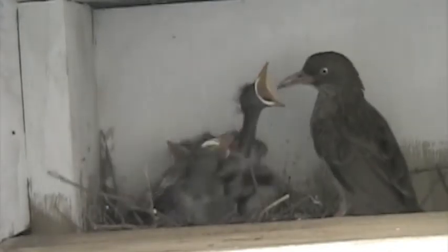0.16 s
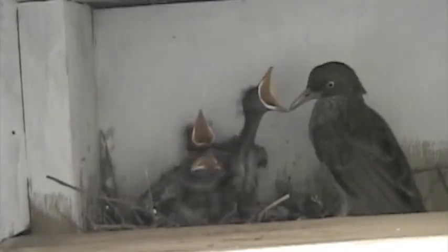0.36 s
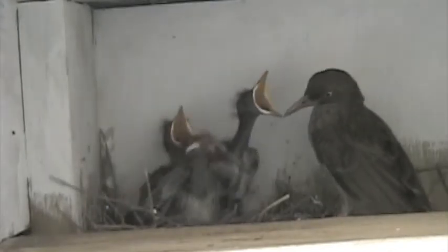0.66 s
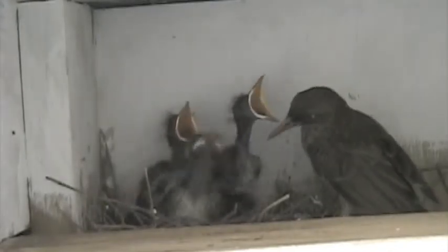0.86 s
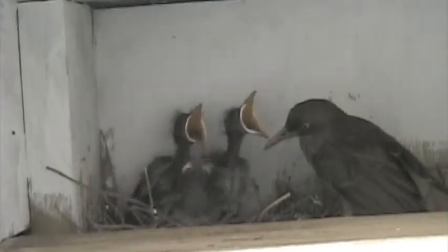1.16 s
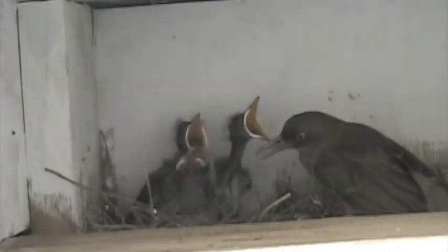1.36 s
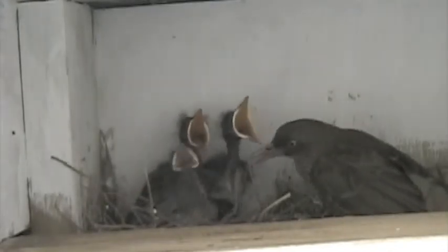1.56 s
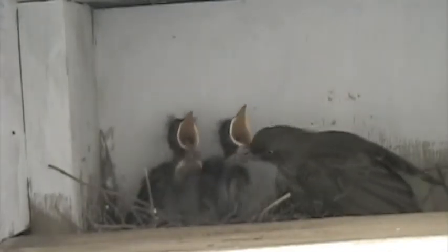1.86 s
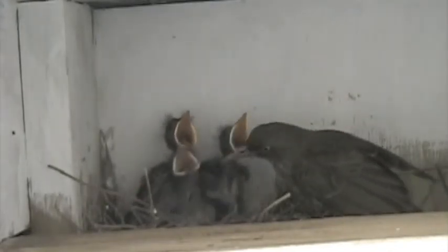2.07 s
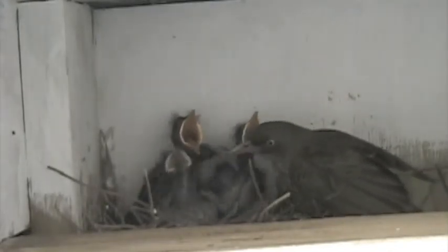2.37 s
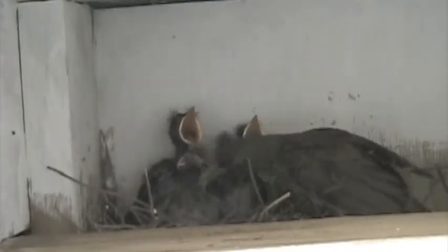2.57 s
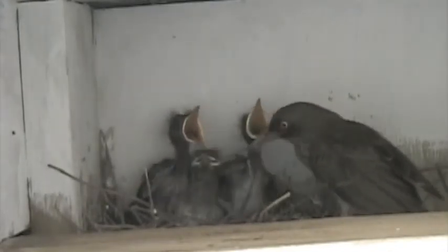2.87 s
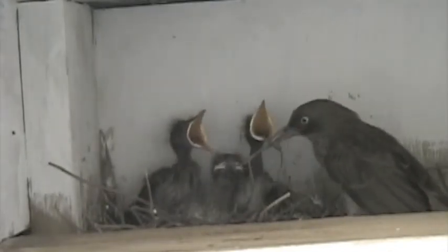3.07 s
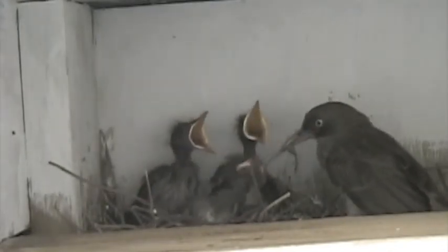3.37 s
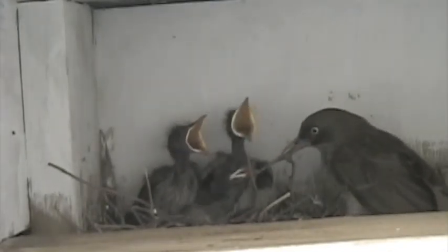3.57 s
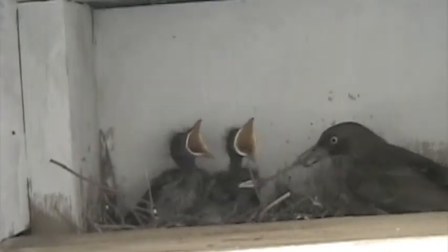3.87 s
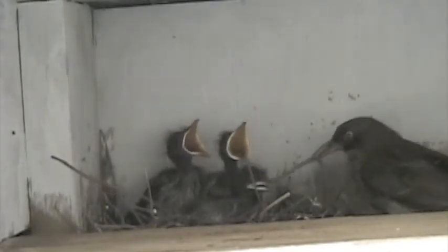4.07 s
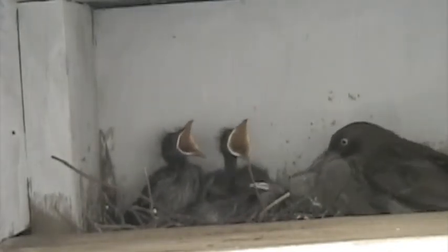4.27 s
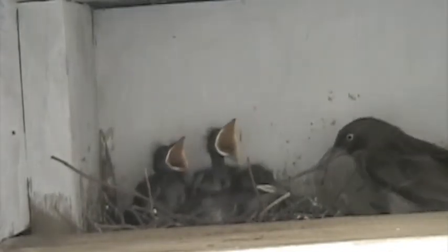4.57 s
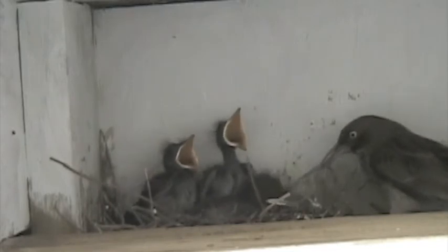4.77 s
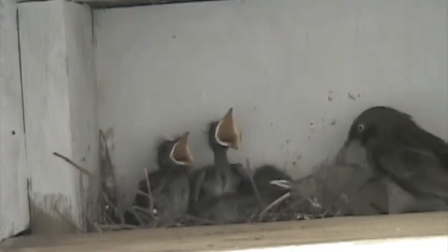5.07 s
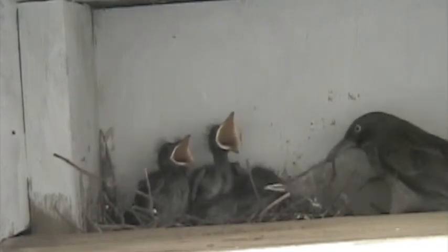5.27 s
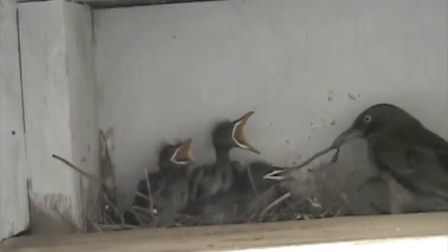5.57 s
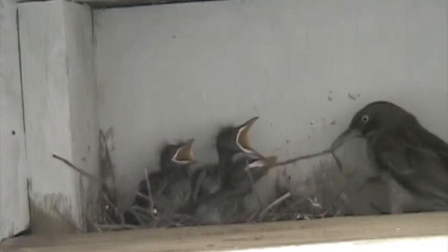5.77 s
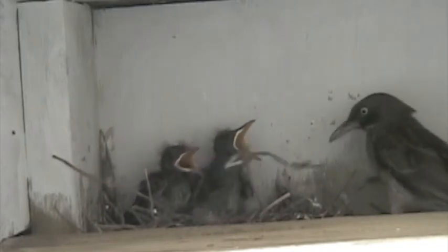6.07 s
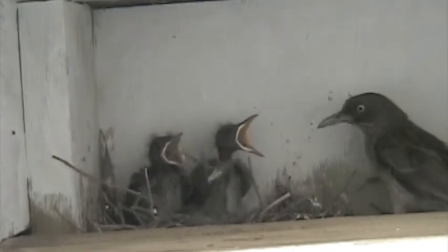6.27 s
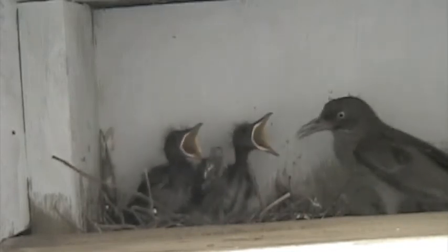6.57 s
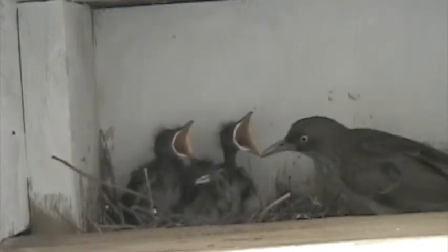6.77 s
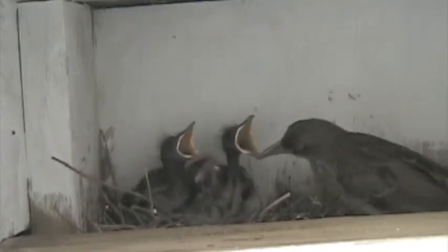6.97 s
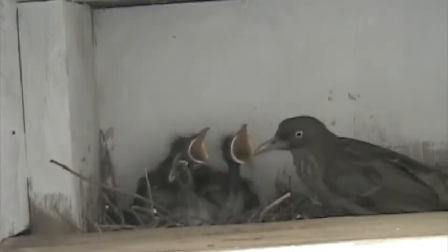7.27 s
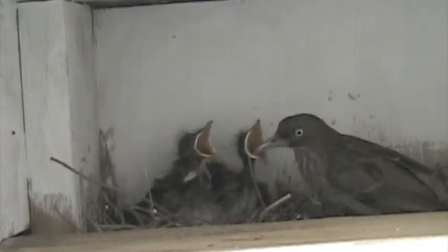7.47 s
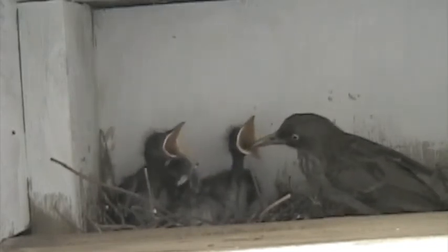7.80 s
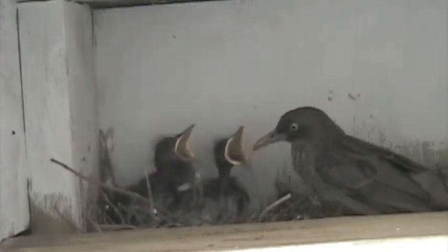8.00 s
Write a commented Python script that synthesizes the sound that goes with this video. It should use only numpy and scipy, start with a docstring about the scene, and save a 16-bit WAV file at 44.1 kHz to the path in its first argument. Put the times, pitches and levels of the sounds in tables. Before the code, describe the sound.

Close, shrill begging from two nestlings on a sheltered wooden ledge, in stereo. A loud screech is already sounding at 0 s, two or three peeps follow near 0.15 s, and another strong screech comes around 0.2-0.45 s. Peeps resume at 0.5 s and a screech at 0.7 s; from about 0.9 s the calls overlap almost continuously. One chick pipes runs of three to six clear peeps, about fourteen a second, each dropping, swelling and usually flicking upward, around 6-7.5 kHz. The other screeches every 0.4 s or so, in fluttering arches near 8-9 kHz, with buzzing double tones and low raspy breaks. From 5 s the peep runs are often shorter, and screeches come forward again after 6.5 s, continuing to the end at 8 s. Boards add brief bright reflections; a faint low outdoor murmur gently swells behind.

```python
"""Two nestlings begging close by

They beg in a nest on a sheltered wooden ledge, close to a camcorder's microphone pair. One chick pipes runs of
nearly pure peeps, about 14 a second: gliding sines with a faint overtone. Another screeches in two-voiced
arches with beating sidebands, which break into low, raspy dips. The boards answer with short noise tails;
behind, filtered noise makes an outdoor murmur, and the background level drops and recovers here and there. The
camcorder combs out the harmonics of its motor, ducks at high peaks and cuts the top of the band."""
import sys
import numpy as np
from scipy import signal
from scipy.fft import rfft, irfft, next_fast_len
from scipy.io import wavfile
from scipy.ndimage import uniform_filter1d, map_coordinates

SR = 44100
rng = np.random.default_rng(int(sys.argv[2]) if len(sys.argv) > 2 else 0)


def inscribe(sig):
    """Save sig as 16-bit PCM at rate SR to the path in sys.argv[1].

    A 1-D sig is mono; a 2-D sig holds one channel per row.
    Samples are clipped to [-1, 1] before scaling.
    """
    pcm = np.round(np.clip(np.atleast_2d(sig).T, -1, 1) * 32767)
    wavfile.write(sys.argv[1], SR, pcm.astype(np.int16))


N = 358974

T = np.arange(-round(.06 * SR), round(.06 * SR)) / SR  # seconds around the middle of a note

# screeches, one call a row, before the scatter and trims of the notes: highest_arch_s, end_s,
# top_pitch_hz, last_arch_pitch_hz, level_db, last_arch_level_db, second_voice_db, sideband_db,
# first_dip_pitch_hz, dips_level_db, closing_fall_level_db
SCREECH_CALLS = [(-0.020, 0.088, 8160, 7980, -10.5, -16, -23.5, -34, 5650, -26.5, -21),
                 (0.267, 0.452, 8536, 7860, -10, -5.5, -25, -32, 5430, -21, -23),
                 (0.712, 0.900, 8760, 7640, -11.5, -11.5, -26, -33.5, 5650, -21.5, -38),
                 (1.155, 1.350, 8890, 7910, -23, -15.5, -27.5, -35, 5600, -28, -40),
                 (1.609, 1.743, 8740, 8770, -15, -18, -23.5, -25, 5450, -23.5, -19),
                 (2.03, 2.19, 8910, 8920, -17, -20.5, -28, -24, 5660, -21, -20),
                 (2.459, 2.590, 9040, 8620, -17.5, -17.5, -24.5, -24.5, 5650, -24.5, -22.5),
                 (2.881, 3.075, 8980, 7680, -16, -21, -25, -26, 5580, -24.5, -54),
                 (3.313, 3.445, 8890, 8600, -19.5, -15.5, -29, -29, 5540, -23.5, -31),
                 (3.724, 3.845, 8940, 8350, -21.5, -22, -21, -21.5, 5530, -23, -28),
                 (4.115, 4.246, 8850, 8350, -17, -19.5, -28, -23.5, 5730, -21.5, -22),
                 (4.53, 4.668, 9100, 8660, -20.5, -25, -22.5, -22, 5910, -21, -19.5),
                 (4.958, 5.041, 8720, 8620, -28, -34, -24.5, -27.5, 5660, -23, -20.5),
                 (5.344, 5.461, 8980, 7590, -31, -13, -26.5, -26.5, 5730, -25.5, -36.5),
                 (5.748, 5.863, 8740, 7890, -26, -19.5, -20, -28.5, 5930, -25, -33),
                 (6.163, 6.347, 8840, 7200, -35, -10, -16.5, -29, 6080, -24.5, -35),
                 (6.615, 6.735, 8830, 8450, -17, -21, -24, -30.5, 5980, -24, -29.5),
                 (7.012, 7.145, 8960, 8380, -13.5, -19.5, -25.5, -23.5, 5870, -22, -23.5),
                 (7.411, 7.540, 9020, 8380, -14, -12, -31.5, -24, 5800, -23.5, -26.5),
                 (7.811, 7.946, 8830, 8480, -15.5, -17, -21.5, -22.5, 5860, -24, -24.5),
                 (8.216, 8.345, 8680, 8400, -19, -20, -26.5, -26, 5700, -25, -30)]


def amp(db):
    """Decibels as an amplitude factor."""
    return 10 ** (np.asarray(db) / 20)


def unit(x):
    """The signal scaled to an rms of 1."""
    return x / np.sqrt(np.mean(x ** 2) + 1e-20)


def along(points, hz):
    """Values between (Hz, value) points, joined on a logarithmic frequency axis."""
    f, v = np.transpose(points)
    return np.interp(np.log(hz + 1), np.log(f + 1), v)


def wobble(rate, size=len(T)):
    """A smooth random curve with rate knots a second."""
    knots = rng.standard_normal(int(size * rate / SR) + 4)
    return map_coordinates(knots, [np.arange(size) * rate / SR])


def filtered(x, response):
    """The signal shaped by a complex response of frequency."""
    m = next_fast_len(x.shape[-1] + SR // 2)  # half a second of padding or more
    spectrum = rfft(x, m) * response(np.fft.rfftfreq(m, 1 / SR))
    return irfft(spectrum, m)[..., :x.shape[-1]]


def pair(alike, size):
    """Stereo noise from a mid and a side, balanced by frequency to set how alike left and right are."""
    def balance(hz):
        turn = np.arccos(np.clip(along(alike, hz), -1, 1)) / 2
        return np.array([np.cos(turn), np.sin(turn)])

    mid, side = filtered(rng.standard_normal((2, size)), balance)
    return np.array([mid + side, mid - side])


def gesture(points):
    """The (s, value) points of one note, joined by lines with rounded corners."""
    s, v = np.transpose(points)
    return uniform_filter1d(np.interp(T, np.sort(s), v), size=130)


def tone(hz):
    """A sine of rms 1 on a moving pitch, from a random phase."""
    cycles = np.cumsum(hz) / SR + rng.random()
    return np.sqrt(2) * np.sin(2 * np.pi * cycles)


def add(track, s, note):
    """Lay a note into a track with its middle at s."""
    at = round(s * SR) - len(T) // 2 + np.arange(len(T))
    inside = (at >= 0) & (at < N)
    track[..., at[inside]] += note[..., inside]


def peeps(overtone_db=-48, waver=0.0036, hoarse=0.028, rest_hz=7700, climb=.55, sink_hz=250,
          throat_top_hz=14200):
    """Each peep drops in from above, swells at the bottom and fades; unless slack, it climbs again."""
    pan_mean_db, pan_scatter_db = 1.95, 2  # left over right; random scatter from peep to peep
    out = np.zeros((2, N))
    swell_db = gesture([(-.024, -80), (-.015, -9), (-.0075, -10), (-.0045, 4.5), (.004, 1),
                        (.011, -8.5), (.02, -9), (.033, -21), (.055, -60)])
    for s, hz, db, hoarseness, slack in peep_notes():
        pan_db = rng.normal(pan_mean_db, pan_scatter_db)
        rise = max(rest_hz - hz, 0) * climb * (1 - slack) - sink_hz * slack
        glide = hz + gesture([(-.021, 604.5), (-.013, 15), (-.006, -100), (.003, 36.5),
                              (.022, rise + 30), (.034, rise + 120), (.05, rise - 250)])
        # hoarseness shakes the pitch fast, on top of a finer waver and a slow drift
        shake = waver * wobble(253) + hoarse * hoarseness ** 2 * wobble(912) + 0.0026 * wobble(74.0)
        pitch = glide * (1 + shake)
        loud = amp(db + swell_db + 3 * hoarseness * wobble(300))
        # the overtone is lost where it climbs past the top of the throat's range
        overtone = amp(overtone_db + 5 * wobble(260)) / (1 + (2 * pitch / throat_top_hz) ** 20)
        note = loud * (tone(pitch) + overtone * tone(2 * pitch))
        add(out, s, note * amp([[pan_db / 2], [-pan_db / 2]]))
    return out


def peep_notes():
    """Evenly spaced peeps in runs. Yields (s, Hz, dB, hoarseness, slackness)."""
    # runs of peeps: first_peep_s, last_peep_s, first_pitch_hz, top_pitch_hz, last_pitch_hz,
    # fall_lateness (power), first_level_db, middle_level_db, last_level_db, opening_hoarseness (0-1)
    runs = [(0.12, 0.187, 7590, 7590, 6220, 1, -22, -23, -19.5, 0.9),
            (0.515, 0.657, 6560, 6860, 6400, 1, -8.5, -14.5, -16.5, 0.26),
            (0.931, 1.282, 6130, 7110, 6350, 0.58, -16.5, -15.5, -16.5, 0.1),
            (1.493, 1.85, 6380, 6980, 6550, 2.2, -18, -15.5, -11, 0.1),
            (2.166, 2.463, 7160, 7206, 6240, 2.6, -12, -16, -15.5, 0.18),
            (2.66, 2.947, 6570, 7240, 6300, 2.6, -16, -10, -13.5, 0.1),
            (3.151, 3.445, 6400, 7510, 6086, 3.1, -16, -18.5, -17, 0.3),
            (3.648, 4.011, 6960, 7480, 6224, 2.02, -21, -17, -16.5, 0.9),
            (4.214, 4.505, 6990, 7540, 5800, 3.25, -10.5, -10.5, -13, .5),
            (4.7, 5.002, 6770, 7635, 5770, 1.9, -12.5, -13, -13, 0.88),
            (5.213, 5.43, 6756, 7490, 6525, 0.98, -10, -15, -10.5, 0.3),
            (5.702, 5.999, 6920, 7080, 6447, 1, -25.5, -11, -10, 0),
            (6.239, 6.384, 7050, 6780, 6800, 1.2, -13, -15.5, -13.5, 0.7),
            (6.637, 6.862, 6920, 7220, 6920, 1.9, -12, -21, -9.5, .3),
            (7.079, 7.293, 7000, 7490, 6810, 1.36, -17, -17.5, -10, .7),
            (7.533, 7.75, 6850, 7530, 7160, 2.2, -19, -14.5, -17.5, 0.9),
            (8.016, 8.081, 6880, 7620, 7550, 1, -17, -12, -14.5, 0.9)]
    gap_s = .073  # approximate: the peeps share out the run evenly
    hoarse_kept, hoarse_least = .45, 0.19  # share left at the next peep; the clearest a peep gets
    # a last peep that sinks below this pitch goes slack: hoarse, with no climb
    slack_hz, slack_span_hz, slack_hoarseness = 6480, 656, 0.72
    for start, end, first_hz, top_hz, last_hz, lateness, first_db, middle_db, last_db, opening in runs:
        count = round((end - start) / gap_s) + 1
        for k, u in enumerate(np.linspace(0, 1, count)):
            sunk = (max(k - 1, 0) / (count - 2)) ** lateness if count > 2 else 1
            hz = top_hz + (last_hz - top_hz) * sunk if k else first_hz
            db = np.interp(u, [0, .5, 1], [first_db, middle_db, last_db])
            slack = np.clip((slack_hz - hz) / slack_span_hz, 0, 1) if k == count - 1 else 0
            hoarseness = max(opening * hoarse_kept ** k, slack_hoarseness * slack, hoarse_least)
            yield start + u * (end - start), hz, db, hoarseness, slack


def arches(fall_hz=800, half_width=.03, gap_hz=740, waver=0.0054, rasp_db=-13, fundamental_db=-43,
           wander_hz=120):
    """Two sides of the syrinx arch in parallel; their beating throws sidebands, most just before the top."""
    out, rasp = np.zeros(N), np.zeros(N)
    swell = amp(gesture([(-.042, -70), (-.029, -2.5), (-.02, 0.5), (.004, -1.16), (.017, -2),
                         (.031, -5), (.055, -52.5)]))
    crest = amp(gesture([(-.032, -33), (-.019, -7.5), (-.009, 0), (.004, -0.5), (.016, -0.5),
                         (.04, -36)]))
    for s, hz, db, second_db, sideband_db in arch_notes():
        arch_hz = hz + 70 - fall_hz * np.minimum((T / half_width) ** 2, 2)  # half_width in seconds
        first = arch_hz * (1 + waver * wobble(491.4) + 0.00932 * wobble(111.85))
        # the second voice wanders on its own, so the sidebands bend apart
        gap = gap_hz * (1 + 0.077 * wobble(702)) + wander_hz * wobble(70)
        first_voice = amp(db - 7.0 + 4.4 * wobble(133.5)) * tone(first)
        second_voice = amp(second_db - 4.0 + 7.5 * wobble(107)) * tone(first - gap)
        above = tone(first + gap)
        above = above + crest * amp(-7) * tone(first + 2 * gap)
        above = above + crest * amp(-12.5) * tone(first + 3 * gap)
        below = amp(min(second_db, sideband_db) - 2) * tone(first - 3 * gap)
        sidebands = crest * (amp(sideband_db - 5 + 3.4 * wobble(198)) * above + below)
        # the throat favours the second harmonic: the fundamental is barely there
        fundamental = amp(db + fundamental_db) * tone(first / 2)
        add(out, s, swell * (first_voice + second_voice + fundamental) + sidebands)
        # the louder the call and its sidebands, the more it rasps
        rasp_level = amp(0.34 * db + 0.79 * sideband_db + rasp_db)
        flutter = amp(4.5 * wobble(400))
        add(rasp, s, swell * rasp_level * flutter)
    return out, rasp


def arch_notes():
    """Screeches rise to the second arch, then droop. Yields (s, top Hz, dB, second voice dB, sideband dB)."""
    # arches of any screech, relative to the call: after_highest_s, second_voice_db, sideband_db
    arch_steps = [(-.075, -3, 1.5), (0, -3, 1.5), (.083, 2, -2), (.16, -6, -38)]
    opening_hz, droop_power = 416, 3.4  # first arch lies below the top; later ones sink ever faster
    sideband_db_per_khz2 = 24  # the voices beat less as the pitch sinks from the top
    for peak, end, top_hz, last_hz, db, last_db, second_db, sideband_db, *_ in SCREECH_CALLS:
        sung = [arch for arch in arch_steps if peak + arch[0] < end - .01]
        for k, (delay, second_step, sideband_step) in enumerate(sung):
            droop = (max(k - 1, 0) / max(len(sung) - 2, 1)) ** droop_power
            sag_hz = (top_hz - last_hz) * droop if k else opening_hz
            sag_loss_db = sideband_db_per_khz2 * (sag_hz / 1000) ** 2
            yield (peak + delay, top_hz - sag_hz, db + (last_db - db) * droop,
                   second_db + second_step, sideband_db + sideband_step - sag_loss_db)


def dips(rough=.024, fundamental_db=-17.5, throat_hz=2660, throat_width=230, overtone_db=-25, rasp_db=-12):
    """The screech breaks to a low, rough note; it sweeps up again unless the call ends there."""
    out, rasp = np.zeros(N), np.zeros(N)
    for s, hz, db, sweep_db, climb, harsh_db in dip_notes():
        fall = 648.5 + 60 * np.clip(db - sweep_db, 0, 12)
        glide = hz + gesture([(-.018, fall), (-.009, 0.301 * fall), (-.001, -200),
                              (.007, 400 * climb - 290), (.015, 1000 * climb - 250),
                              (.03, 2100 * climb - 200)])
        pitch = glide * (1 + rough * wobble(1400) + 0.019 * wobble(215.8))
        contour_db = gesture([(-.018, -90.5), (-.011, db - 1.5), (.002, db + 0.087),
                              (.013, sweep_db - .7), (.021, sweep_db - 28), (.04, -92)])
        loud = amp(contour_db + 2.4 * wobble(400))
        # the fundamental shows only while it passes the lowest throat resonance
        resonance = 1 / (1 + ((glide / 2 - throat_hz) / throat_width) ** 4)
        low = amp(fundamental_db + 2.5 * wobble(115.4)) * resonance
        # the overtone fades as the sweep carries it out of the throat's range
        high = amp(overtone_db) / (1 + (2 * glide / 12800) ** 20)
        add(out, s, loud * (tone(pitch) + low * tone(pitch / 2) + high * tone(2 * pitch)))
        add(rasp, s, loud * amp(rasp_db + harsh_db))
    return out, rasp


def dip_notes():
    """Dips between arches, then a closing fall. Yields (s, base Hz, dB, sweep dB, climb share, extra rasp dB)."""
    # dips of any screech, relative to the call: after_highest_arch_s, level_db, upward_sweep_db
    dip_steps = [(-.0445, 0.5, 11), (0.0432, -1, 9), (0.13, 1.5, 1)]
    later_dip_hz = 5630  # base pitch of every dip but the first, before scatter
    scatter_hz, scatter_db = 69.6, 1.5
    shallow_db_per_khz = 17  # the less deep a dip, the louder
    # sideband level of an ordinary screech; a purer call rasps less in its dips too
    ordinary_sideband_db, rasp_follows = -26, .4
    # the last note sinks on where a dip would sweep up
    closing_hz, closing_sweep_db, closing_climb = 6440, -5, -0.18
    for peak, end, *_, sideband_db, first_hz, dips_db, closing_db in SCREECH_CALLS:
        harsh_db = rasp_follows * (sideband_db - ordinary_sideband_db)
        for k, (delay, step_db, sweep_db) in enumerate(dip_steps):
            hz = rng.normal(later_dip_hz if k else first_hz, scatter_hz)
            shallow_db = shallow_db_per_khz * (hz - later_dip_hz) / 1000
            db = rng.normal(dips_db + step_db + shallow_db, scatter_db)
            if peak + delay < end - .025:
                yield peak + delay, hz, db, dips_db + sweep_db, 1, harsh_db
        yield end, closing_hz, closing_db, closing_db + closing_sweep_db, closing_climb, harsh_db


def rasp_hiss():
    """Steady noise in the colour of the screeching throat, to be shaped by the rasp of the notes."""
    # colour of the rasp: frequency_hz, relative_density_db (per Hz)
    rasp_colour = [(1500, -29), (2650, -8), (3500, -18), (4600, -4.5), (5700, -2.5), (7500, 8.5),
                   (9500, -17), (11300, -4.5), (12600, -18), (15000, -37)]
    return unit(filtered(rng.standard_normal(N), lambda hz: amp(along(rasp_colour, hz))))


def ports(x):
    """High notes reach the two microphone ports with different strength and phase."""
    # the screeching chick at the microphone pair: frequency_hz, left_over_right_db, left_lead_radians
    port_differences = [(4500, 0, 0), (5600, -1, 0.1), (6120, 1.5, 1.2), (6900, -3, 0.04), (7850, 2, -1.9),
                        (8540, -8.5, -1.6), (9260, -5.5, -0.3), (10240, -9, -0.36), (11460, 2.5, 2.15)]
    f, tilt_db, lead = np.transpose(port_differences)

    def left_and_right(hz):
        strength = amp(np.interp(hz, f, tilt_db) / 2)
        half = strength * np.exp(.5j * np.interp(hz, f, lead))
        return np.array([half, 1 / half])

    return filtered(x, left_and_right)


def boards(x, t60=0.16, count=24):
    """The boards round the nest answer with brief noise tails that slowly change."""
    # stereo likeness of the answer: frequency_hz, left_right_likeness (-1 to 1)
    echo_likeness = [(4500, 1), (5600, .97), (6900, 0.86), (8000, 0.15), (11000, 0.05)]
    t, out = np.arange(SR // 5) / SR, np.zeros((2, N))
    place = np.linspace(0, count - 1, N)
    for k in range(count):
        # the decay is 60 dB in t60 seconds, after 1.5 ms of silence
        tail = pair(echo_likeness, len(t)) * amp(-60 * t / t60) * (t > .0015)
        tail = tail / np.linalg.norm(tail[0])
        # neighbouring tails crossfade
        near = np.flatnonzero(abs(place - k) < 1)
        part = x[:, near] * (1 - abs(place[near] - k))
        echo = signal.fftconvolve(part, tail, axes=1)[:, :N - near[0]]
        out[:, near[0]:near[0] + echo.shape[1]] += echo
    return out


def air():
    """A distant outdoor murmur of coloured stereo noise; the background level drops and recovers here and
    there."""
    # course of the murmur, before the lift: time_s, level_db
    murmur_course = [(0.0, -41.5), (0.41, -40), (0.84, -41), (1.11, -44.5), (2.15, -40), (2.38, -43),
                     (2.81, -38.5), (3.38, -44.5), (4.06, -41), (4.76, -41), (4.9, -44.5), (5.58, -47),
                     (6.08, -41.5), (6.44, -43.5), (7.0, -38.5), (7.37, -41.5), (7.89, -40), (8.14, -39.5)]
    # colour of the murmur: frequency_hz, relative_density_db (per Hz)
    murmur_colour = [(25, -16.5), (55, -1.5), (90, -1), (140, 0.5), (240, 2.5), (420, 1), (580, -8.5),
                     (800, 0.5), (1050, -7), (1350, -4.5), (2200, -9), (3200, -15.5), (5000, -18),
                     (8000, -18), (11000, -43), (15000, -57)]
    # stereo likeness of the murmur: frequency_hz, left_right_likeness (-1 to 1)
    murmur_likeness = [(30, -0.43), (70, -0.68), (140, 0.55), (350, 0.85), (700, 0.63), (1400, 1),
                       (3000, 1)]
    lift_db = 2
    noise = pair(murmur_likeness, N)
    murmur = unit(filtered(noise, lambda hz: amp(along(murmur_colour, hz))))
    level_db = np.interp(np.arange(N) / SR, *np.transpose(murmur_course)) + lift_db
    return murmur * amp(level_db)


def scene():
    """Both chicks, the answer of the boards and the outdoor air."""
    arch, arch_rasp = arches()
    dip, dip_rasp = dips()
    screeches = arch + dip + rasp_hiss() * (arch_rasp + dip_rasp)
    chicks = peeps() + ports(screeches)
    boards_db = -4.5
    return chicks + amp(boards_db) * boards(chicks) + air()


def record(dry, feedback=0.6, depth=0.82, ceiling_db=-4, release_db_per_s=30):
    """A comb notches the motor's harmonics, gain ducks at high peaks and creeps back, and the band ends."""
    motor_hz, top_hz = 299.7, 15400

    def comb(hz):
        turn = np.exp(-2j * np.pi * hz / motor_hz)  # a delay of one motor period
        return 1 - depth * (1 - feedback) * turn / (1 - feedback * turn)

    x = filtered(dry, comb)
    need_db = np.minimum(0, ceiling_db - 20 * np.log10(abs(x).max(0) + 1e-9))
    creep_db = release_db_per_s * np.arange(N) / SR
    gain_db = np.minimum.accumulate(need_db - creep_db) + creep_db
    levelled = x * amp(uniform_filter1d(gain_db, size=130))
    return filtered(levelled, lambda hz: hz < top_hz)


dry = scene()
out = record(dry)
inscribe(out)
```